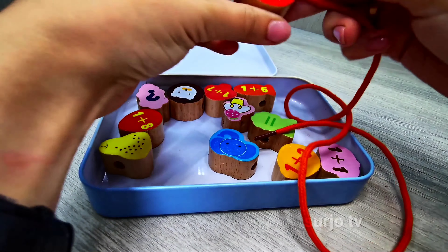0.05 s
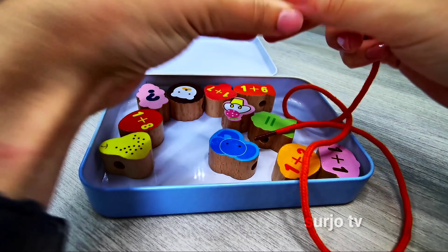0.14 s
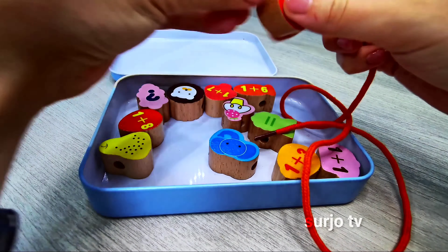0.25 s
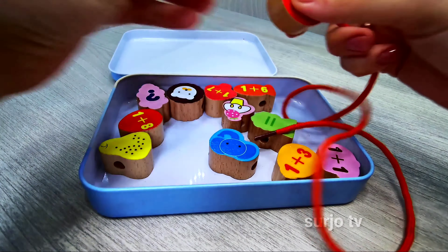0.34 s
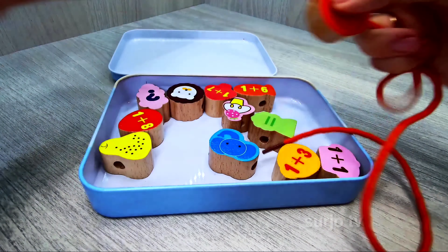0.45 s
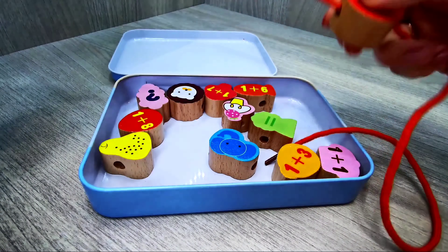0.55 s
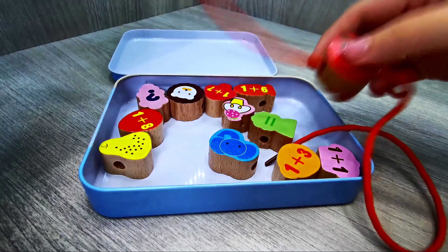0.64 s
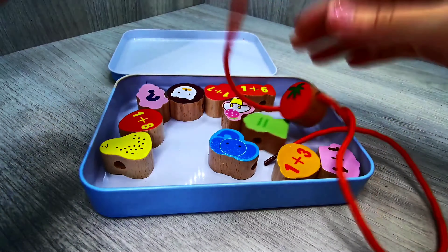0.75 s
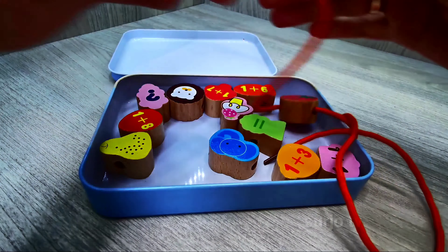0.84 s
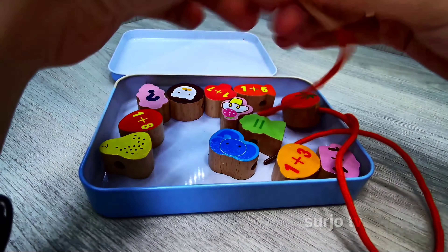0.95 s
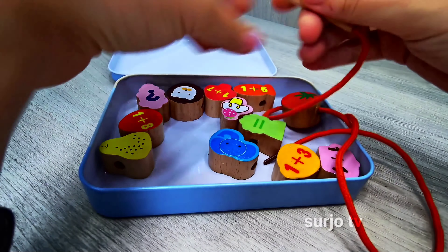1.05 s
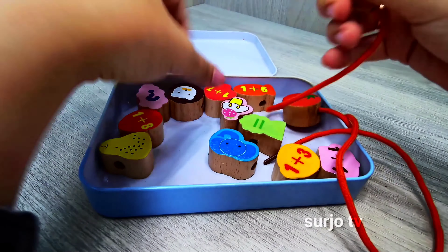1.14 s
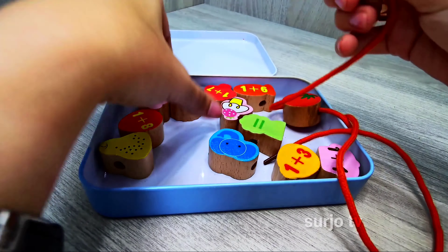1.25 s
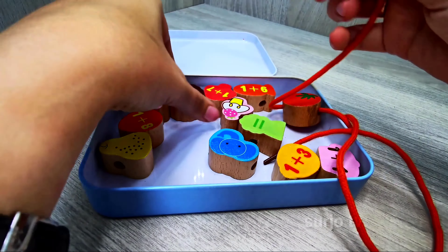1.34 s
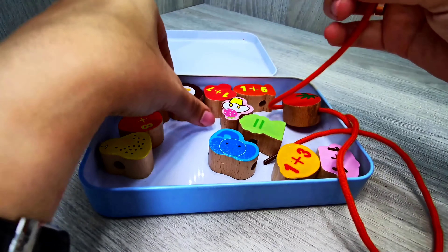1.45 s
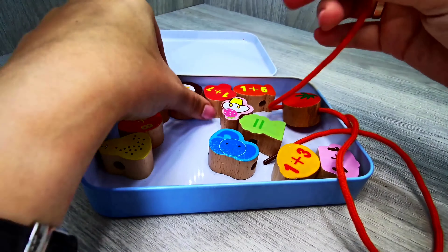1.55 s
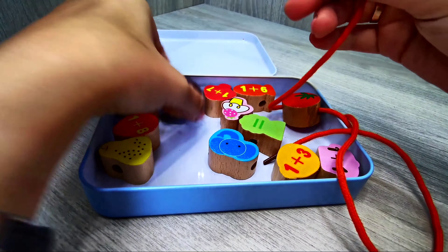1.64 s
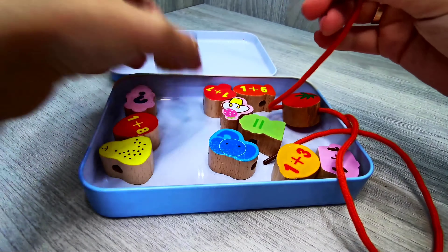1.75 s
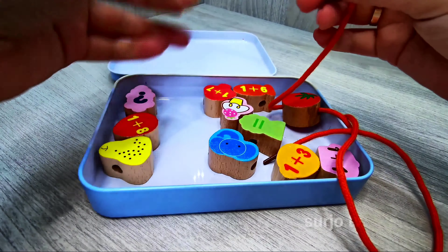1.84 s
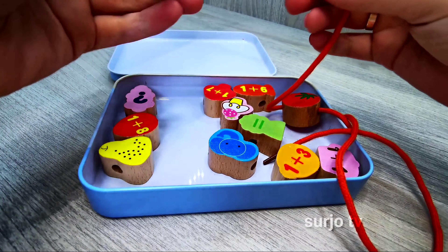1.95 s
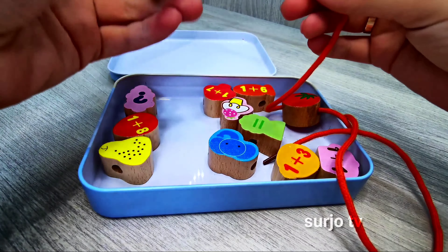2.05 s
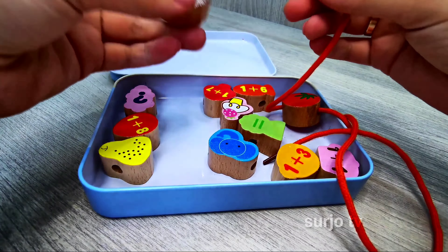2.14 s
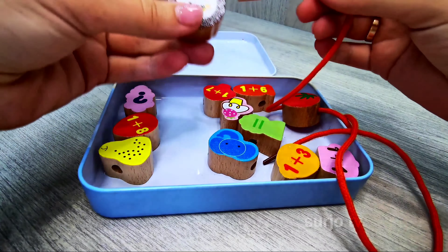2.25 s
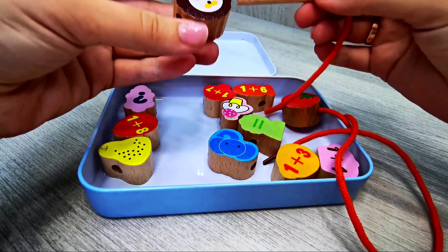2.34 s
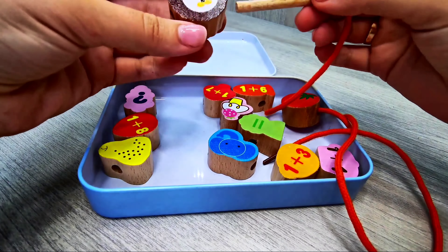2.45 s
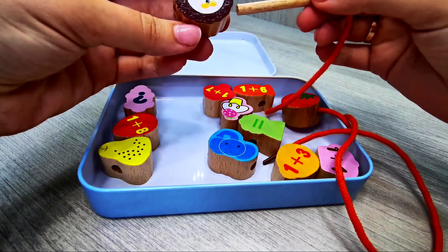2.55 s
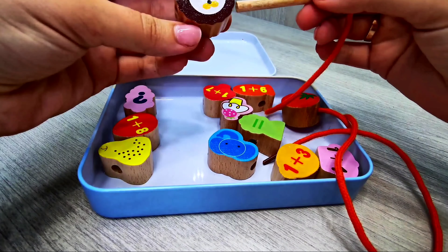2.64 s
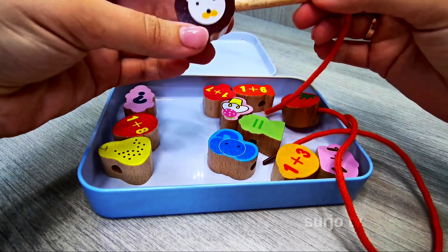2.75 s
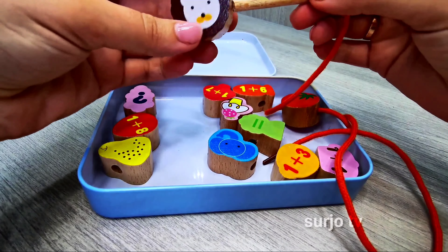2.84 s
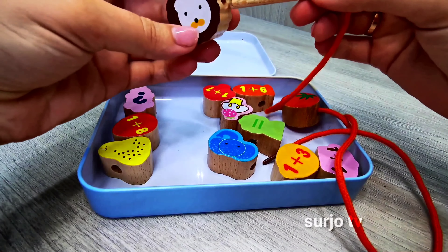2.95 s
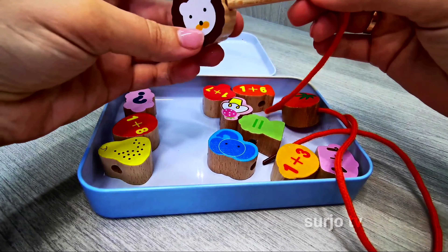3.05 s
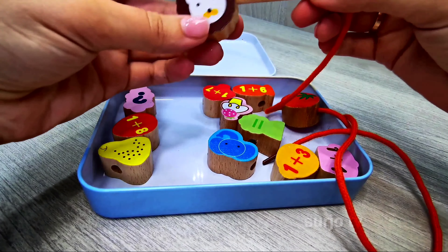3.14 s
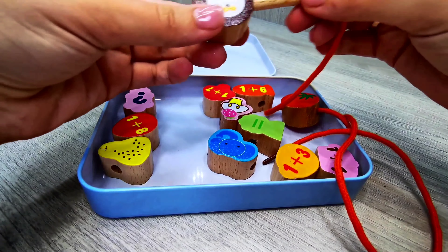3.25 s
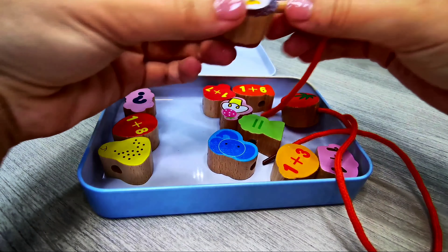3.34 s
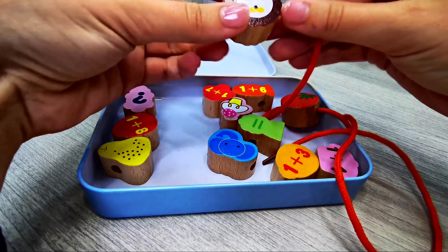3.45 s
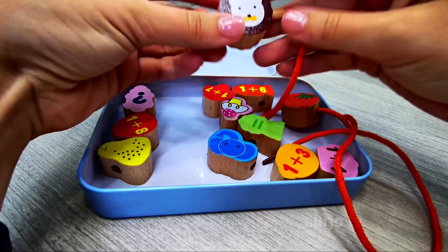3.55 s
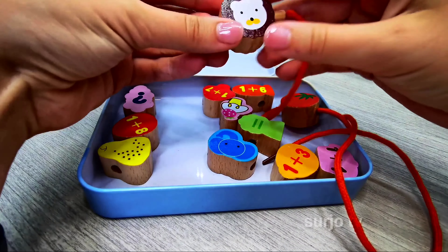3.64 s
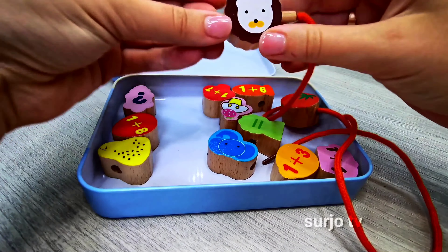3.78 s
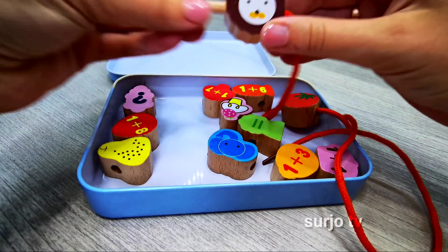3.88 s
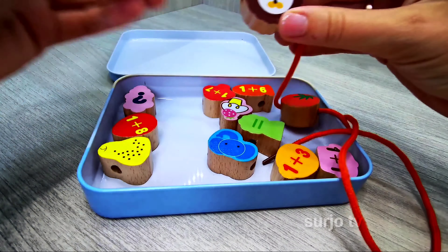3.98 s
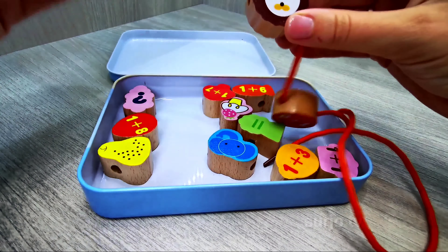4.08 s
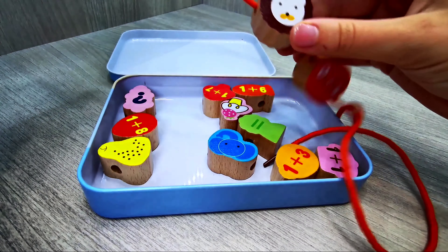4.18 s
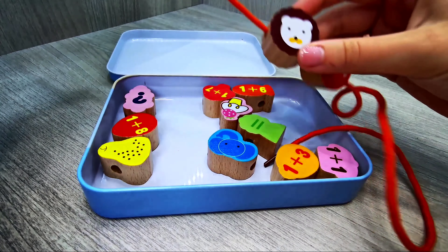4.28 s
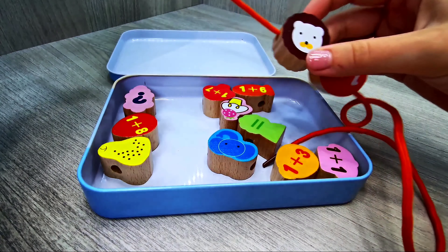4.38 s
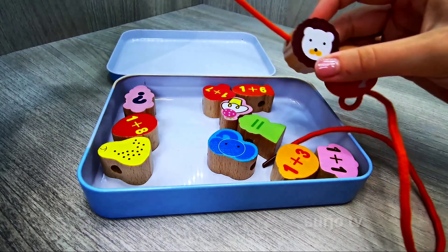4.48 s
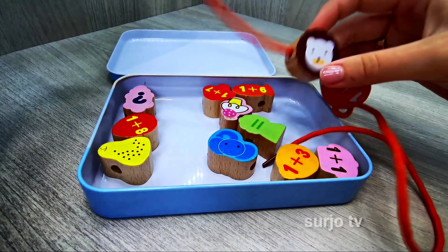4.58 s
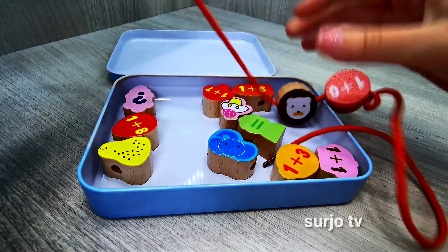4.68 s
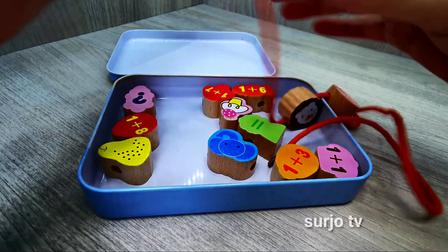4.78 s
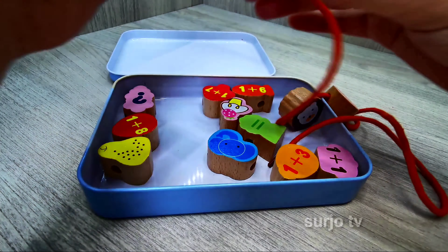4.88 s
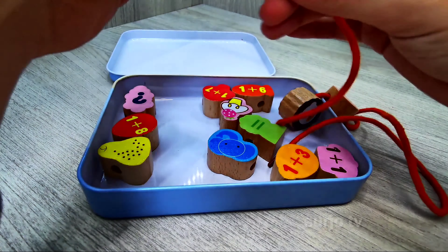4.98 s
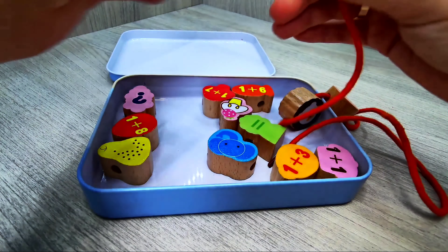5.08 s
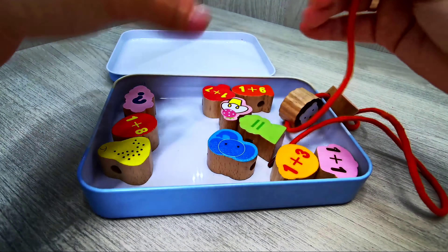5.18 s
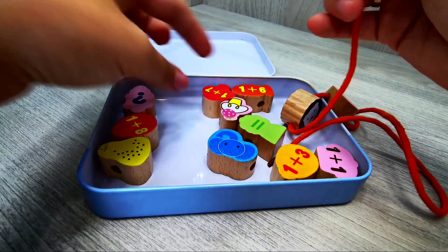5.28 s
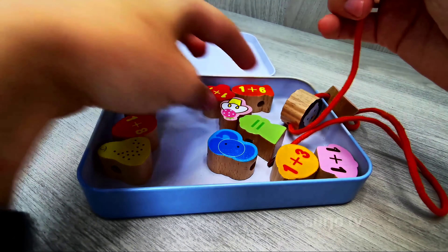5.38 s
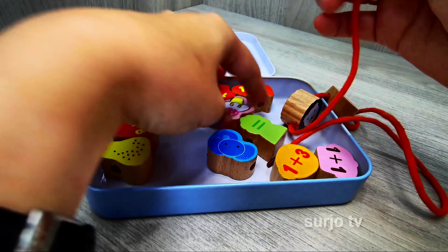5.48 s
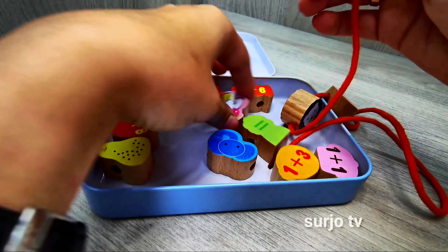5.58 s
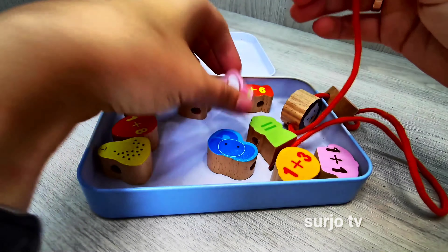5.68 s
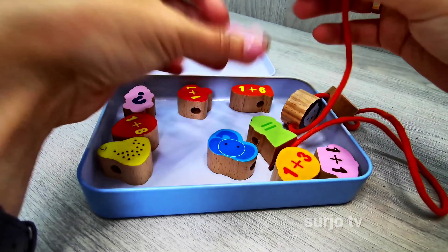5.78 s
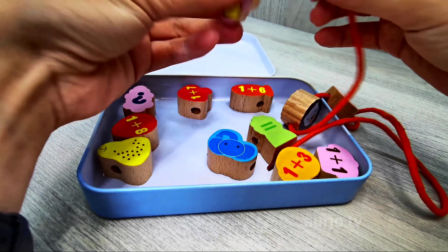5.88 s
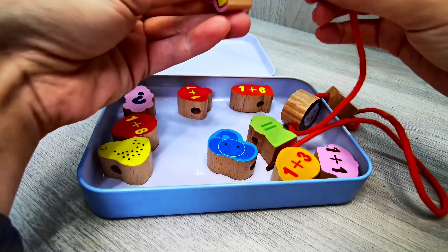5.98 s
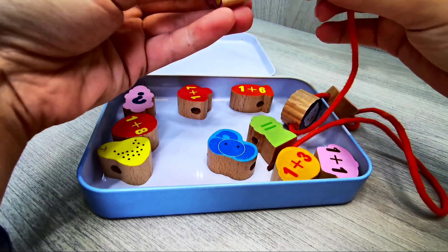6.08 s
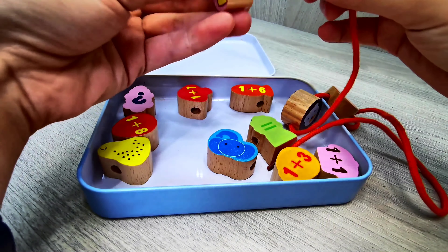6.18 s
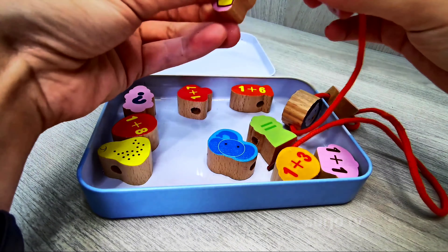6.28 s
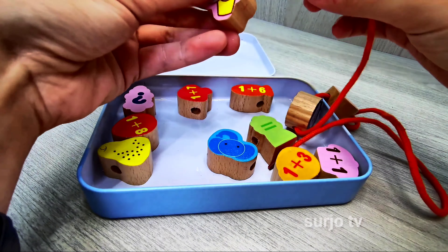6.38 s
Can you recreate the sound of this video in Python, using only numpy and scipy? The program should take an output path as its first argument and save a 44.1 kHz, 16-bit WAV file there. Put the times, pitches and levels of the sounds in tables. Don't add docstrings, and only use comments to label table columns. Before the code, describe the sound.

Close stereo microphone over a small metal tin on a table. Faint wood ticks and a rising cord swish lead to a hard, short-ringing bead drop, then muffled gripped knocks. Quiet handling and thin braid rubs follow, then a second drop, a denser clatter with scraping. Finally beads are barely nudged aside over low rumble and faint room hum.

```python
import sys
import numpy as np
from scipy import signal
from scipy.fft import rfft, irfft, next_fast_len
from scipy.io import wavfile
from scipy.ndimage import uniform_filter1d, map_coordinates

SR = 44100
rng = np.random.default_rng(int(sys.argv[2]) if len(sys.argv) > 2 else 0)


def makeup_ratio(level_db):
    decades = np.asarray(level_db, float) / 20
    return 10 ** decades


def log_audio(samples):
    frames = np.atleast_2d(samples).T
    limited = np.clip(frames, -1, 1)
    pcm = np.round(limited * 32767).astype(np.int16)
    wavfile.write(sys.argv[1], SR, pcm)


N = 283122

# start in seconds, click peak in dB, weight (boom) in relative dB,
# hardness (crack) in relative dB, pitch favoured by the spot in Hz.
BLOWS = [(.873, -44.5, -3, -5, 1250), (.8889, -9.5, -18.5, -7, 1740), (.8948, -15.5, -10, -7.5, 2120),
         (.9084, -19.5, -6, -7.5, 1530), (.957, -42.5, -11, -5, 2250), (.9782, -9, -11, -7, 1750),
         (.9868, -18, -10.5, -10.5, 1180), (1.0276, -14.5, -15.5, -6, 2920), (1.036, -26, -7.5, -6, 1940),
         (1.0494, -32, -2, -2, 2080), (1.1324, -61, 6, -3.5, 1250), (1.205, -72, 10.5, 2, 7000),
         (4.2592, -27.5, -8.5, -10.5, 1824), (4.277, -39.5, -3, -10, 1827), (4.785, -45.5, -21, -16, 1820),
         (4.8042, -11.5, -17, -12.5, 2380), (4.8125, -21, -14, -17.5, 1266),
         (4.8195, -28.5, -14.5, -17.5, 1250), (4.832, -26.5, -15.5, -15, 1846),
         (4.8375, -28.5, -14.5, -8.5, 4930), (4.8488, -23, -8.5, -17, 1870), (4.8585, -21, -11, -18, 2300),
         (4.8655, -21, -6.5, -14.5, 1250), (4.874, -27.5, -10, -11.5, 1100), (4.883, -29, -1.5, -12, 1846),
         (4.891, -34.5, -10, -12, 2340), (4.9024, -32, -4.5, -10, 1100), (4.914, -29, -7.5, -12.5, 1658),
         (4.922, -33.5, -8.5, -11.5, 2000), (4.9566, -7.5, -24.5, -15, 2330),
         (4.9775, -28.5, -12, -16, 1950), (5.007, -42, -9, -16, 2240), (5.0384, -53.5, -4, 2, 3400)]
GRIPS = [(1.4582, -32, -6.5, -9, 1310), (1.462, -33.5, -6.5, -11.5, 1217), (1.4685, -39.5, -7, -14.5, 2100),
         (1.4994, -62.5, 20, -14, 1670), (1.587, -56, -1.5, -18, 1235), (1.5925, -50.5, -8, -22, 1225),
         (1.601, -35, -2, -7.5, 1970), (1.6082, -19, -11, -11, 1290), (1.621, -36, -10, -11.5, 1332),
         (1.6676, -37.5, -2, -11.5, 2290), (1.681, -45, -12.5, -12, 1250), (1.7878, -42, -3, -7, 2274),
         (1.792, -34.5, -12, -4, 1184), (1.801, -39.5, -13, -2, 1243), (1.8165, -49, -7, -3, 3940)]
NUDGES = [(5.6585, -49, -12, -13.5, 1240), (5.6685, -48.5, -11, -4, 1255), (5.6885, -42.5, -24, -22, 1250),
          (5.7215, -40, -8, -13, 1250), (5.7245, -42, -18, -13, 1200), (5.746, -44.5, -3, -16.5, 1190),
          (5.759, -46, -6, 0.5, 955), (5.7675, -44.5, -18, -11.5, 1980), (5.7765, -42, -22, -9.5, 1846),
          (5.7835, -42.5, -17, -8.5, 1830), (5.793, -47, -1.5, -8, 1870), (5.8035, -43.5, -24, -12, 1255),
          (5.815, -46, -20, -12, 1210), (5.8255, -49.5, -1.5, -11.5, 940), (5.84, -50, 0, -14, 1340)]
TICKS = [(.0962, -50, 1, -2, 1780), (.1196, -54, -6, -9, 2000), (.2069, -60, 0, 1, 3000),
         (.2339, -59, -11, 2.5, 5000), (.3037, -58, -18, -7.5, 1930), (.407, -54.5, -10, 0, 6570),
         (.7345, -47, -43, 6, 7007), (.739, -50.5, -33.5, 7.5, 7000), (3.0607, -71.5, -17, -6, 1999),
         (3.209, -68.5, -8, -11, 1620), (3.288, -51.5, -20, 15, 7260), (3.2898, -51, -22, 13.5, 8515),
         (3.2964, -56, -13.5, 9, 6000), (3.5534, -52, -8, -4, 5040), (3.6994, -67.5, -14.5, -14, 2160),
         (4.1624, -60.5, -14, 11.5, 9000), (4.2425, -66.5, -20, 12, 9960), (4.4209, -36.5, -41, -15, 3166),
         (4.5084, -86.5, 3.5, 10.5, 11120), (4.5361, -61.5, -26, 9.5, 9410),
         (4.5614, -62.5, -27.5, 12, 9470), (4.593, -47.5, -35, 3.5, 2680), (4.7194, -71, -8.5, 10.5, 9550),
         (4.7454, -75.5, 3, 9.5, 8970), (4.903, -48.5, -20, 13.5, 10860), (5.0385, -51.5, -21.5, 14, 9480),
         (5.373, -72, 7.5, -1.5, 6000), (6.4124, -55.5, -41, -3, 2830)]

# frequency in Hz, level in dB, t60 in seconds.
TIN = [(79, -8, 0.17), (97, -8, 0.22), (160.4, 3, .11), (346, -6.5, 0.081), (412.5, 1.5, 0.095),
       (655, -4, 0.12), (781, -3.5, 0.071), (890, -11.5, 0.023), (1271, -4, 0.093), (1486, -8.5, 0.072),
       (1609, -11, 0.056), (1850, 0.5, 0.029), (2000, -9, 0.1), (2176, -1.5, 0.07), (2304, -9.5, 0.13),
       (2290, -4.5, 0.018), (2680, -9.5, 0.022), (2860, -16, 0.021), (3120, -15, 0.12), (3230, -8, 0.048),
       (4120, -9.5, 0.064), (5080, -0.5, 0.035), (6630, -4, 0.029)]
# frequency in Hz, level in dB, t60 in seconds.
HELD = [(84, -5.5, 0.12), (149, 0.5, 0.074), (277, -11, 0.083), (345, -6, 0.076), (465, -5.5, 0.069),
        (660, -21, 0.048), (814, -21, 0.077), (1250, -3.5, 0.043), (1360, -6.5, 0.034), (1710, 1, 0.033),
        (1997, 1.5, 0.05), (2290, -3, 0.034), (2600, -12, 0.026), (3000, -24.5, 0.025), (3455, -0.5, 0.052),
        (4300, -7.5, 0.023), (5830, -0.5, 0.011)]
# frequency in Hz, level in dB, t60 in seconds.
BEAD = [(150, -4, .025), (400, -2, .015), (700, -4, .01), (950, -5, .01), (2050, -1, .016),
        (2400, -1, .016), (3000, -2, .014), (3750, -1, .014), (4300, -2, .012), (6800, -5, .01)]
# clack at weight 0 in dB, clack growth in dB per dB of weight, ring length factor,
# lowest click in Hz, highest click in Hz.
TIN_TOUCH = (-4, 0.27, 0.5967, 1050.5, 3300)
GRIP_TOUCH = (-8.5, -0.17, 0.92, 1008, 3094)
NUDGE_TOUCH = (-12.5, -0.2, 0.54, 900, 1752)
BEAD_TOUCH = (-4, 0.2, 1.5, 1499.5, 5007)
# low edge in Hz, high edge in Hz.
BANDS = [(70, 500), (500, 1100), (1100, 3200), (3200, 16000)]

# firmest press in seconds, rise in seconds, fall in seconds,
# level in dB, brightness in relative dB.
SLIDE = [(.92, 0.014, 0.027, -32, 1.5), (.96, 0.038, 0.024, -47.5, -0.5), (.974, 0.0038, 0.0039, -32, -7.5),
         (1.06, 0.016, 0.058, -41.5, -6.5), (1.17, 0.037, .12, -60.5, -12.5), (1.62, .012, 0.02, -36, -5),
         (1.672, 0.03, 0.035, -44, -10), (1.793, 0.016, 0.057, -45.5, 0), (4.812, .008, 0.026, -27.5, -1),
         (4.86, 0.064, 0.0893, -35.5, 0), (4.915, 0.052, 0.036, -31, -3), (4.952, .012, 0.0063, -38, -8.5),
         (4.98, 0.024, 0.052, -40.5, -3.5), (5.038, 0.0099, 0.063, -63.5, 9.5),
         (5.665, 0.032, .09, -56, -0.5), (5.772, 0.077, 0.067, -49, 5.5), (5.82, 0.16, 0.064, -49, -0.5)]
# start in seconds, peak in dB, frequency in Hz, t60 in
# seconds.
PINGS = [(.8888, -10.5, 1420, 0.026), (.8925, -19.5, 2250, .03), (.891, -28, 5050, .02),
         (0.907, -24, 1780, .035), (0.978, -14, 1750, .025), (0.98, -22, 2750, .03), (0.984, -20, 926, .04),
         (.979, -30, 3910, .015), (1.4603, -13.5, 135, .04), (1.459, -32, 1900, .03),
         (1.6075, -17, 2000, .03), (3.2895, -20.5, 6640, .012), (3.2868, -36, 15000, .012),
         (4.4212, -33.5, 2260, .03), (4.4215, -47, 660, .04), (4.958, -22, 4195, .035),
         (4.806, -20.5, 1260, .08), (4.804, -23, 2420, .05), (4.806, -31, 5910, .07),
         (4.8355, -26, 4930, .015), (4.8505, -26, 4930, .018), (4.858, -28, 4930, .018),
         (4.879, -32, 4930, .02), (4.916, -30.5, 1700, .05), (4.957, -17, 2100, .03),
         (5.6885, -46, 1260, .03), (5.7227, -38, 1250, .03), (5.7825, -51, 1850, .02)]

# strongest pull in seconds, rise in seconds, fall in seconds,
# hiss in dB, body in relative dB.
CORD = [(.05, 0.097, 0.25, -59, 0.5), (.238, 0.076, 0.059, -69, 4.5), (.33, 0.072, 0.044, -67.5, -2.5),
        (.415, 0.015, 0.14, -69, 2.5), (.58, 0.19, 0.11, -46.5, -12), (.742, 0.31, 0.025, -41.5, -21.5),
        (.8, 0.16, 0.84, -71, -1), (1.055, 0.0062, 0.014, -36.5, -9), (1.135, 0.014, 0.19, -68.5, -10.5),
        (1.806, 0.0084, 0.068, -53.5, -2.5), (3.05, 0.044, .045, -74, 1), (3.185, 0.029, 0.067, -75, -11),
        (3.3, .012, 0.018, -59.5, -16), (3.33, 0.065, 0.068, -67, -7.5), (3.42, 0.077, 0.18, -62.5, -13),
        (3.53, 0.074, 0.052, -52, -6), (3.68, 0.082, 0.16, -69.5, -6), (4.09, 0.072, 0.16, -52, -7),
        (4.166, 0.041, 0.073, -42, -34), (4.36, 0.32, 0.1, -49.5, -18), (4.64, 0.21, 0.094, -48.5, -18),
        (5.2, 0.085, 0.064, -83, -9), (5.375, 0.087, 0.036, -72, -3.5), (6.41, 0.085, 0.033, -79, -5.5)]
# frequency in Hz, density in dB per Hz.
HISS = [(710, -48), (1200, -30.5), (1850, -15.5), (3000, -7), (4090, -6.5), (4860, -5.5), (7800, -3.5),
        (10700, -7.5), (15700, -14)]
# frequency in Hz, density in dB per Hz.
RUB = [(150, -32.5), (400, -1.5), (1200, -8.5), (2500, -3.5), (4000, -2), (6000, -37.5)]
# frequency in Hz, left-right likeness from -1 to 1.
CORD_ALIKE = [(60, 0.94), (240, 0.81), (950, 0.36), (3770, -0.19), (15000, -0.38)]
# frequency in Hz, left over right in dB.
CORD_SIDE = [(60, 1.5), (180, 4), (550, 7.5), (1650, 6.5), (4970, -2.5), (15000, 18)]
# frequency in Hz, width in Hz, level in dB.
HOLE = [(6960, 170, -9), (9430, 61, 1), (10300, 24, -5), (10700, 110, 0), (10900, 34, -2), (12900, 32, -2),
        (14400, 97, -5), (15300, 74, -4.5)]
# start in seconds, frequency in Hz, level in dB, overtone in dB, length in seconds.
TWANG = (.525, 325, -59, -54, .065)
# strongest pull in seconds, rise in seconds, fall in seconds,
# sheen in dB, whistle in relative dB.
FUZZ = [
    (.06, 0.071, 0.078, -58.5, 4.5),
    (.43, 0.0299, 0.15, -67.5, 6),
    (.47, 0.036, .12, -59.5, -11),
    (3.41, 0.033, 0.12, -68, -10),
    (3.68, 0.04, 0.045, -71, -16.5),
    (4.245, .012, 0.017, -56, -18),
    (4.575, .025, .12, -60.5, -11),
    (5.17, 0.018, 0.11, -82.5, -0.5),
]
# frequency in Hz, density in dB per Hz.
SHEEN = [(6000, -23.5), (8500, -2.5), (10800, -3), (13000, -7), (15000, 17.5), (15700, -7.5)]
# frequency in Hz, density in dB per Hz.
WHISTLE = [(6300, -25), (6750, -7), (7050, -6.5), (7400, -18)]

# start in seconds,
# peak in dB, frequency in Hz, t60 in seconds.
JOLTS = [(0.108, -35, 60.6, 0.11), (0.23, -44.5, 69.7, 0.19), (0.416, -39.5, 69, 0.067),
         (0.433, -37.5, 84, 0.082), (1.155, -39.5, 85, 0.11), (1.294, -44.5, 94.6, 0.1),
         (1.46, -33.5, 84, 0.16), (.889, -23, 151.9, 0.066), (2.367, -54, 54.8, 0.31),
         (2.702, -58, 65.3, 0.16), (3.624, -50, 61, 0.16), (3.703, -49.5, 65.7, 0.17),
         (4.606, -47.5, 66.3, 0.4), (4.638, -52, 73.7, 0.14), (5.668, -55, 77.8, 0.47),
         (5.914, -49.5, 73.6, 0.32), (6.093, -53, 67.7, 0.28)]
# time in seconds, level in dB.
LEAN = [(0, -64), (.25, -64), (.67, -57), (.8, -64), (1.09, -52), (1.399, -67.5), (1.65, -58), (1.9, -70.5),
        (2.9, -75.5), (3.64, -75), (4.25, -63.5), (4.45, -73), (4.8, -65), (5.1, -63.5), (5.55, -80),
        (5.82, -74), (6.42, -76.5)]
# frequency in Hz, density in dB per Hz.
WOOD = [(38, -30), (55, -7), (68, 0), (84, -1), (105, -10), (135, -30)]
# frequency in Hz, density in dB per Hz.
RUMBLE = [(12, -9.5), (25, 4.5), (45, -6.5), (70, -9), (110, -24.5)]
# frequency in Hz, density in dB per Hz.
AIR = [(65, -52), (110, -23), (133, -7), (151, -0.5), (174, -17.5), (220, -23), (429, -23), (467, -22.5),
       (912, -26), (1200, -29.5), (2060, -29.5), (6390, -38), (6810, -38.5), (15100, -34.5), (16400, -65)]
# frequency in Hz, left-right likeness from -1 to 1.
AIR_ALIKE = [(60, 0.31), (180, 1), (550, -0.29), (1650, -0.3), (4970, 0.04), (15000, -0.54)]
# frequency in Hz, t60 in seconds.
ROOM = [(200, 0.21), (2000, 0.14), (10000, 0.085)]
# frequency in Hz, level in dB.
SHADOW = [(65, 0.5), (130, -1), (250, -1), (500, -5.5), (2200, -6.5), (4500, -0.5), (6500, -2),
          (9200, -3.5), (10600, -13), (14000, -18)]
# frequency in Hz, width in Hz, level in dB.
PORT = [(6970, 440, 5), (7470, 680, -4.5), (10720, 1500, 3), (15100, 490, 3.5)]
TOP_HZ = 15750


def contacts(rows, modes, touch, spot_db, spot_q, **manner):
    out = np.zeros((2, N + SR))
    clack_db, clack_grows, stretch, low_hz, high_hz = touch
    for s, db, boom_db, crack_db, spot_hz in rows:
        boom, clack, click, crack = ringing(modes, stretch, **manner)
        click = band(click, low_hz, high_hz)
        bright = click / np.abs(click[0]).max() + makeup_ratio(crack_db + 8.5) * crack
        push_cycles = .2
        u = np.arange(len(click[0])) / SR * spot_hz / push_cycles - 2
        bright = bright - makeup_ratio(-1.4) * (1 - u * u) * np.exp(-u * u / 2)
        spot = signal.lfilter(*signal.iirpeak(spot_hz, spot_q, fs=SR), bright)
        bright = bright + makeup_ratio(spot_db) * spot
        hit = makeup_ratio(boom_db + 5.0) * boom + makeup_ratio(clack_db + clack_grows * boom_db + 1.5) * clack + bright
        out[:, round(s * SR):][:, :hit.shape[1]] += makeup_ratio(db + 1.0) * hit
    return out[:, :N]


def ringing(modes, stretch, dense_db, crack_s, lag_s, chatter_s):
    t = np.arange(SR // 4) / SR
    hz, db, t60 = np.transpose(modes)[:, :, None]
    level = makeup_ratio(db + rng.normal(0, 2.5, hz.shape) - 60 * t / (t60 * stretch))
    level = level * rng.choice([-1, 1], hz.shape)
    detune = 1 + rng.normal(0, 0.0077, hz.shape)
    late = (lag_s + rng.normal(0, .00007, hz.shape)) * np.clip(hz / 900, 0, 1) ** 2
    tones = np.array([level * np.sin(2 * np.pi * hz * detune * (t - d)) for d in (0, late)])

    chatter = np.zeros((1, SR // 20))
    delays = rng.random(6)
    rebounds = rng.uniform(.05, .45, 6) * (1 - .6 * delays)
    chatter[0, (delays * chatter_s * SR).astype(int)] = rebounds
    chatter[0, 0] = 1

    parts = []
    for (low, high), share, apart in zip(BANDS, [.12, .7, 1.3, 2.2], [.25, .6, .85, .95]):
        own = ((hz >= low) & (hz < high))[:, 0]
        white = rng.standard_normal((2, len(t)))
        white = (1 - apart) * white[0] + apart * white
        haze = unit(band(white + 0.17 * np.roll(white, 1, axis=1), low, high))
        decay = makeup_ratio(dense_db - 60 * t / (stretch * t60[own].mean())) + makeup_ratio(3.5 - 60 * t / crack_s)
        part = tones[:, own].sum(axis=1) + makeup_ratio(db[own].max()) * share * decay * haze
        part = band(part * (1 - np.exp(-t / 0.00039)), low * 0.87, TOP_HZ)
        part = signal.fftconvolve(part, chatter, axes=1)[:, :len(t)]
        parts.append(part / np.abs(part[0]).max())
    return parts


def slide():
    catches_per_s, lag_s = 900, 0.00014
    catches = (rng.random(N) < catches_per_s / SR) * makeup_ratio(4 * rng.standard_normal(N)) * rng.choice([-1, 1], N)
    force = unit(catches) + .4 * rng.standard_normal((2, N))
    level_db, bright_db = np.array(strokes(SLIDE, edge_db=25.5, bend=1.3)) + 2.8 * wobble(70)
    grit = band(force + 1.6 * rng.standard_normal((2, N)), 3200, 14000)
    out = makeup_ratio(bright_db - 4.5) * unit(grit)
    lower = [m for m in TIN if 130 < m[0] < 1100]
    upper = [m for m in TIN if 1100 < m[0] < 3200]
    for modes, part_db in [(lower, level_db + 0.57), (upper, bright_db - 1.5)]:
        def ports(f):
            plate = sum((-1) ** k * makeup_ratio(db) * resonance(f, hz, 3.3 / t60) for k, (hz, db, t60) in enumerate(modes))
            return plate * [1 + 0 * f, np.exp(-2j * np.pi * f * lag_s)]
        loudness = np.sqrt(np.mean(filtered(force, ports) ** 2))
        out += filtered(force * makeup_ratio(part_db), ports) / loudness
    return out


def pings():
    out = np.zeros((2, N + SR))
    t = np.arange(SR // 8) / SR
    for s, db, hz, t60 in PINGS:
        lag = np.array([[0], [1.2 * min(hz / 900, 1) ** 2]])
        swell = makeup_ratio(db - 60 * t / t60) * (1 - np.exp(-t / 0.00084))
        out[:, round(s * SR):][:, :len(t)] += swell * np.sin(2 * np.pi * hz * t - lag)
    return out[:, :N]


def tin_sounds():
    tin = contacts(BLOWS, TIN, TIN_TOUCH, spot_db=2.5, spot_q=14,
                   dense_db=-2, crack_s=0.0023, lag_s=0.00021, chatter_s=0.006)
    tin = tin + slide() + pings()
    tin = tin + contacts(GRIPS, HELD, GRIP_TOUCH, spot_db=1, spot_q=7.2,
                         dense_db=-1.5, crack_s=0.0028, lag_s=0.00015, chatter_s=0.0055)
    tin = tin + contacts(NUDGES, TIN, NUDGE_TOUCH, spot_db=7.0, spot_q=12,
                         dense_db=-3, crack_s=0.00394, lag_s=0.0002, chatter_s=0.004)
    bass_hz, wall_hz = 50, 14200
    return filtered(tin, lambda hz: (1j * hz / (1j * hz + bass_hz)) ** 2 / (1 + 1j * hz / wall_hz))


def bead_ticks():
    return contacts(TICKS, BEAD, BEAD_TOUCH, spot_db=3.5, spot_q=5.6,
                    dense_db=4.0, crack_s=0.0062, lag_s=.0001, chatter_s=0.0044)


def cord():
    ridges = np.sin(2 * np.pi * np.cumsum(52 + 9 * wobble(12)) / SR)
    pull_db, body_db = strokes(CORD, edge_db=29.5, bend=2.0)
    hiss_db = pull_db + 1.1 * ridges + .6 * wobble(80) + 2.2 * wobble(700)
    hiss = rush(HISS, CORD_ALIKE, patchy_db=3)
    hiss = hiss + makeup_ratio(body_db - pull_db) * rush(RUB, CORD_ALIKE, patchy_db=3.0)

    def hole_and_lean(f):
        hole = 1 + sum(makeup_ratio(db - 3) * resonance(f, hz, width) for hz, width, db in HOLE)
        return hole * makeup_ratio(np.outer([.5, -.5], along(CORD_SIDE, f)))
    return filtered(makeup_ratio(hiss_db - 3.0) * hiss, hole_and_lean)


def twang():
    s, hz, db, overtone_db, length = TWANG
    t = np.arange(N) / SR - s
    swell = np.sin(np.pi * np.clip(t / length, 0, 1)) * makeup_ratio(3 * wobble(61.1) - 2)
    return swell * (makeup_ratio(db) * np.sin(2 * np.pi * hz * t) + makeup_ratio(overtone_db) * np.sin(2 * 2 * np.pi * hz * t))


def fuzz():
    sheen_db, whistle_db = np.array(strokes(FUZZ, edge_db=20.5, bend=0.7)) + 1.4 * wobble(300)
    sheen = makeup_ratio(sheen_db) * rush(SHEEN, CORD_ALIKE, patchy_db=4.5)
    return sheen + makeup_ratio(whistle_db) * rush(WHISTLE, CORD_ALIKE, patchy_db=6.5)


def table():
    t = np.arange(SR // 2) / SR
    jolts = np.zeros(N + SR)
    for s, db, hz, t60 in JOLTS:
        swell = makeup_ratio(db + 5.0 - 60 * t / t60) * (1 - np.exp(-t / 0.0085))
        jolts[round(s * SR):][:len(t)] += swell * np.sin(2 * np.pi * hz * t)
    lean_db = np.interp(np.arange(N) / SR, *np.transpose(LEAN))
    tremble = makeup_ratio(lean_db + 1.5) * rush(WOOD, [(80, 0.47)])
    rumble = makeup_ratio(-66.5 + 1.3 * wobble(5.7)) * rush(RUMBLE, [(30, 0.68)])
    return jolts[:N] + tremble + rumble


def air():
    return makeup_ratio(-67.82 + .7 * wobble(15)) * rush(AIR, AIR_ALIKE)


def room(x):
    hz, t, z = signal.stft(rng.standard_normal((2, SR // 2)), SR, nperseg=256)
    tail = signal.istft(z * makeup_ratio(-60 * t / along(ROOM, hz)[:, None]), SR, nperseg=256)[1]
    late = np.pad(x, ((0, 0), (200, 0)))
    return signal.fftconvolve(late, tail / np.linalg.norm(tail[0]), axes=1)[:, :N]


def shaded(x, share):
    return filtered(x, lambda hz: [1 + 0 * hz, makeup_ratio(share * along(SHADOW, hz))])


def strokes(rows, edge_db, bend):
    s, rise, fall, db, colour_db = np.transpose(rows)[:, :, None]
    t = np.arange(0, N + 32, 32) / SR
    reach = np.where(t < s, (s - t) / rise, (t - s) / fall)
    power = makeup_ratio(2 * (db - np.minimum(edge_db * reach ** bend, 200)))
    sums = [power.sum(axis=0), (power * makeup_ratio(2 * colour_db)).sum(axis=0)]
    return [np.interp(np.arange(N) / SR, t, 10 * np.log10(p)) for p in sums]


def rush(spectrum, alike, patchy_db=0.):
    z = signal.stft(rng.standard_normal((2, N)), nperseg=256)[2]
    field = uniform_filter1d(rng.standard_normal(z.shape[1:]), size=5, axis=0)
    field = uniform_filter1d(field, size=20, axis=1)
    pair = signal.istft(z * makeup_ratio(patchy_db * unit(field)), nperseg=256)[1][:, :N]

    def mid_side(hz):
        turn = np.arccos(np.clip(along(alike, hz), -1, 1)) / 2
        colour = makeup_ratio(along(spectrum, hz)) * (hz > spectrum[0][0]) * (hz < spectrum[-1][0])
        return colour * [np.cos(turn), np.sin(turn)]
    mid, side = filtered(pair, mid_side)
    return unit(np.array([mid + side, mid - side]))


def wobble(rate):
    return map_coordinates(rng.standard_normal(int(N * rate / SR) + 4), [np.arange(N) * rate / SR])


def resonance(f, hz, width):
    return 1j * f * width / (hz * hz - f * f + 1j * f * width)


def filtered(x, response):
    m = next_fast_len(N + SR // 2)
    return irfft(rfft(x, m) * response(np.fft.rfftfreq(m, 1 / SR)), m)[..., :N]


def band(x, low, high):
    return signal.sosfilt(signal.butter(3, [low, high], "band", fs=SR, output="sos"), x)


def along(points, hz):
    f, v = np.transpose(points)
    return np.interp(np.log(hz + 1), np.log(f + 1), v)


def unit(x):
    return x / np.sqrt(np.mean(x ** 2) + 1e-20)


def scene():
    near = tin_sounds() + makeup_ratio(1.5) * bead_ticks()
    hits = shaded(near + makeup_ratio(-15.0) * room(band(near, 230, 15500)), 0.97)
    strings = cord() + twang() + makeup_ratio(2.5) * shaded(fuzz(), 0.8)
    return hits + strings + table() + shaded(air(), 0.45)


def band_limit(x):
    return signal.sosfilt(signal.butter(12, 16840, fs=SR, output="sos"), x)


def record(dry):
    headroom = 1.1

    def port(f):
        peaks = [1 + (makeup_ratio(db) - 1) * resonance(f, hz, width) for hz, width, db in PORT]
        return np.prod(peaks, axis=0) * np.where(f < TOP_HZ, 1, makeup_ratio(-24.0))
    mix = filtered(headroom * np.tanh(dry / headroom), port)
    return band_limit(mix)


dry = scene()
out = record(dry)
log_audio(out)
```